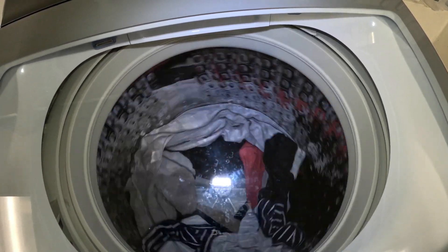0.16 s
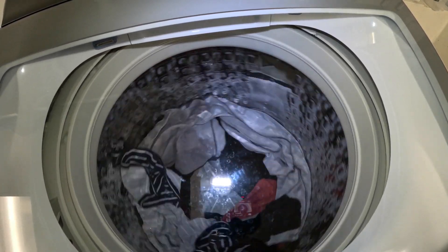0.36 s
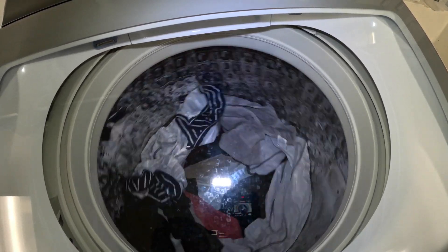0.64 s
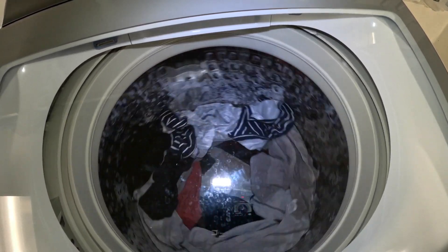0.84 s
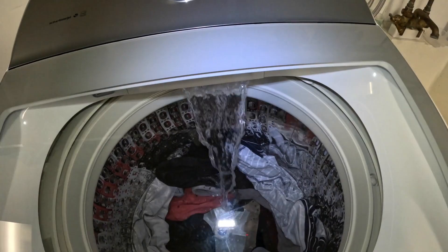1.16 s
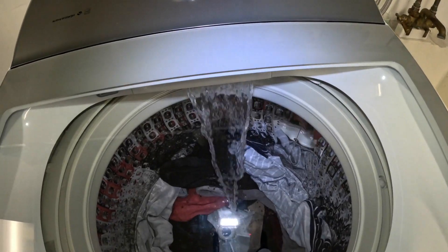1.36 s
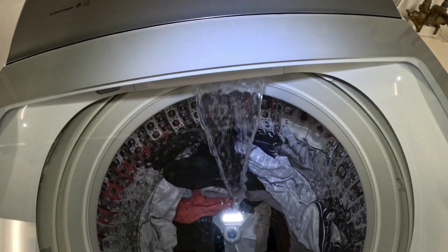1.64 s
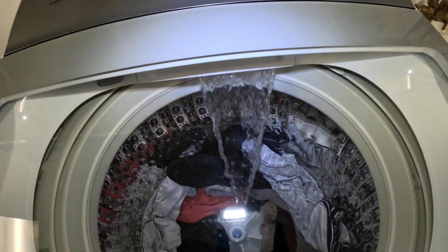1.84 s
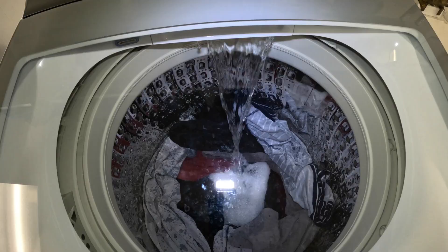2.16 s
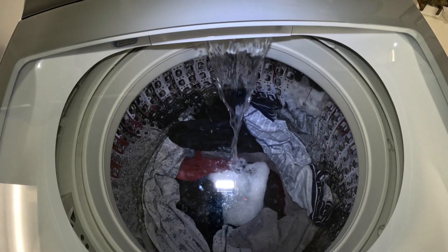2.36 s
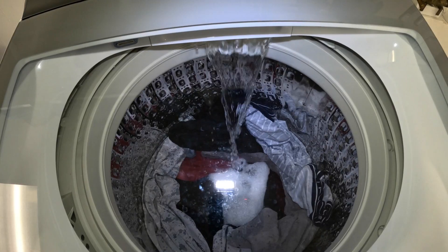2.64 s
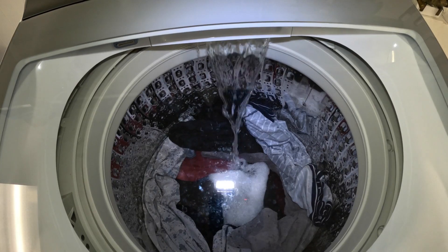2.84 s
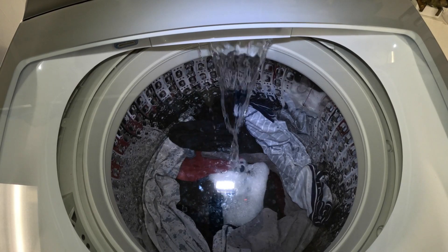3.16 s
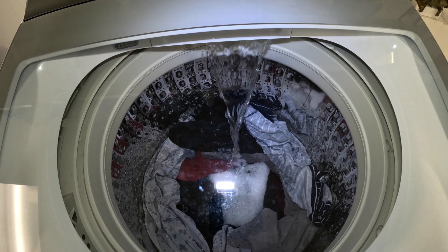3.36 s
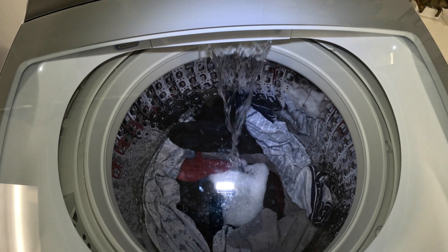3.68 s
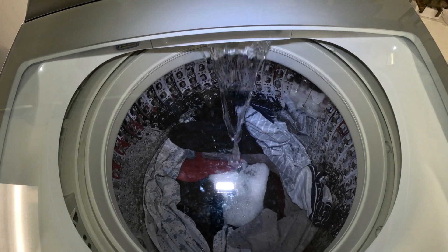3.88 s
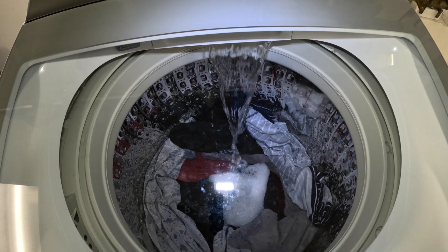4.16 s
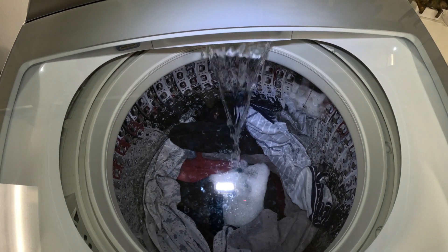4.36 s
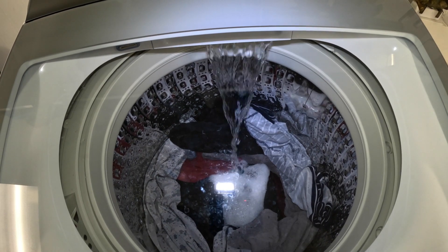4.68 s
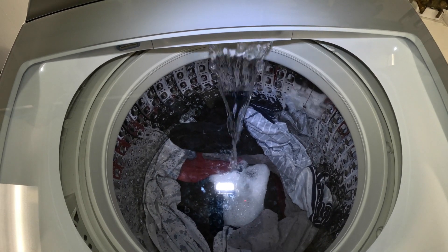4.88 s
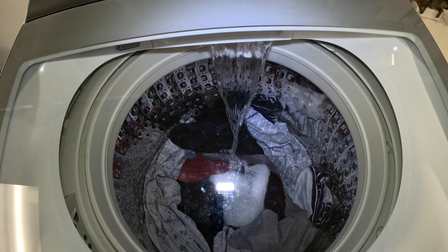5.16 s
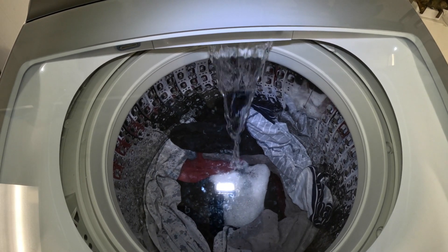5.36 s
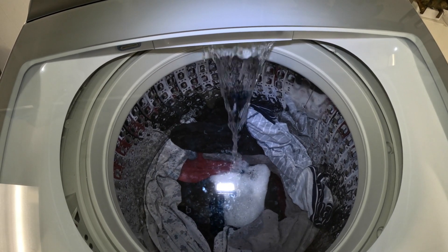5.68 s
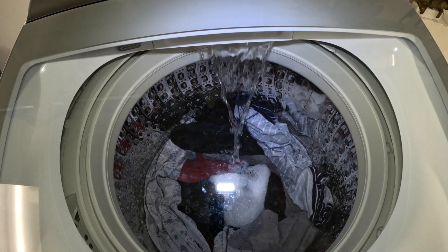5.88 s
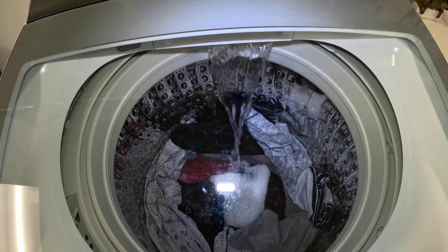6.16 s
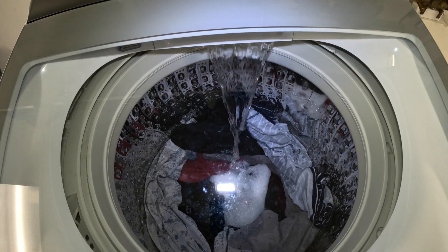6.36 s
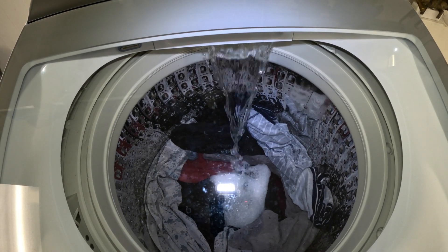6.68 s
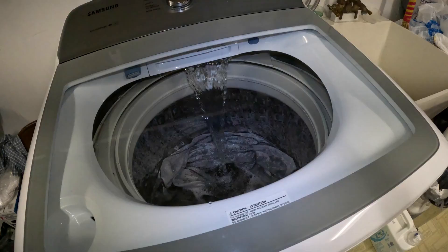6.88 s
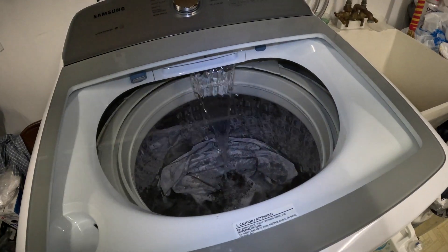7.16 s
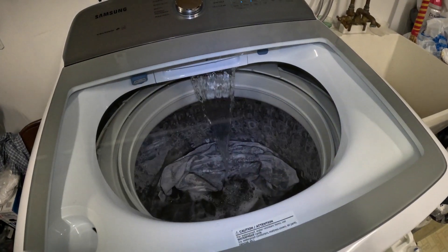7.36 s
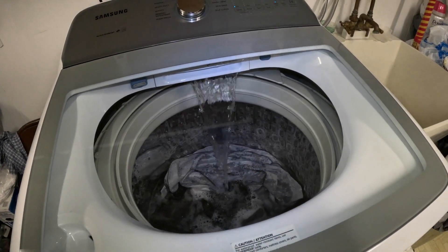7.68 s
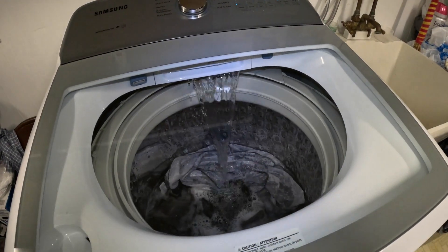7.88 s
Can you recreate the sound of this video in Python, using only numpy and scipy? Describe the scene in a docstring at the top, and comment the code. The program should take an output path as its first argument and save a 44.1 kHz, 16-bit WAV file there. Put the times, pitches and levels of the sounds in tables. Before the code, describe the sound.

A top-loading washer's drum coasts with faint low hum swells for a second. Water abruptly pours in close by, hissing and booming with a hollow gurgle, a few small knocks and ticks. The pour then becomes steady, boomier and less sharp, with occasional splashes. It stops dead for a moment, and returns fading in, quieter and farther away, in a small utility room.

```python
"""Top-loading washer filling

A washer is heard from four spots: its drum coasts as swelling sine hums over noise; then water hisses
and pours as patchy noise shaped by resonances of drum and cabinet, first close, then from a step aside.
A hollow gurgle, knocks, bright ticks and splashes join it; after a short silence the rush fades in
further off."""
import sys
import numpy as np
from scipy import signal
from scipy.fft import rfft, irfft, next_fast_len
from scipy.io import wavfile
from scipy.ndimage import uniform_filter1d

SR = 44100
rng = np.random.default_rng(int(sys.argv[2]) if len(sys.argv) > 2 else 0)


def bounce(signal):
    """Save signal as a 16-bit WAV file at the path given by the first command-line argument."""
    frames = np.transpose(np.atleast_2d(signal))
    limited = np.clip(frames, -1, 1)
    pcm = np.round(limited * 32767).astype(np.int16)
    wavfile.write(sys.argv[1], SR, pcm)


N = 353814

# Timeline. Each entry: start in seconds of the coasting, close, aside, silent and far parts.
PART_STARTS = [0, .9799, 2.222, 6.9186, 7.091]
COAST_S, CLOSE_S, ASIDE_S, SILENT_S, FAR_S = PART_STARTS

# Swells of the drum's hum. Each row: start in s, length in s, frequency in Hz, rms level at the crest in dB.
HUM_SWELLS = [(-.03, .24, 60, -50.5), (.28, .5, 57.2, -48.5), (0.771, .09, 57.1, -52),
              (.86, .13, 57.1, -54.5)]
# Cabinet shake around the hum. Each row: frequency in Hz, relative density in dB per Hz.
SHAKE_SPECTRUM = [(10, -40), (22, 0), (40, -11), (70, -2), (110, -9), (170, -21), (230, -34), (400, -120)]
# Murmur resonances. Each row: frequency in Hz, width in Hz, relative level in dB.
MURMUR_MODES = [(220, 18, -9.5), (258, 35, -4.5), (309, 25, -3), (345, 33, -10.5)]
# Room before the water. Each row: frequency in Hz, relative density in dB per Hz.
ROOM_SPECTRUM = [(240, -25), (400, -5), (536, -9), (865, -12.5), (1180, -12), (1960, -20.5), (4240, -27.5),
                 (5870, -23), (9040, -35), (16000, -48)]
# Room likeness. Each row: frequency in Hz, left-right correlation.
ROOM_LIKENESS = [(60, 0.86), (240, 0.9), (950, 0.25), (3770, 0.32), (15000, 0.33)]
# Faint motor whine. One row: frequency in Hz, width in Hz, rms level in dB.
MOTOR_WHINE = (5701, 30, -97)
HUM_POWER = 1  # exponent of each swell's sine arch
SHAKE_DB, MURMUR_DB, HUSH_DB = -8, -62.5, -77  # the shake is relative to the hum

# Water at the close, aside and far spots. Each row: hiss in dB, initial boom in dB, boom growth in dB per s.
WATER_LEVELS = [(-34.5, -38.5, 3), (-34.5, -34.5, 0.11), (-54, -52.5, 0.5)]
# Air in drum and cabinet. Each row: frequency in Hz, width in Hz, relative level in dB close, aside, far.
DRUM_MODES = [(54, 14.5, -10.5, -11.5, -8), (85.2, 16, -11.5, -14.5, -11.5), (119.6, 16, -17, -12, -10.5),
              (159, 27, -12, -19, -12), (215.9, 14.5, -3, -1.5, -1.5), (240.2, 9.8, -3, 3.5, -2),
              (273.3, 15.3, -1, -1, 2), (299.6, 18, -7, -5, -6.5), (343.5, 20.6, -7.5, -4.5, -5.5),
              (418.5, 23, -12, -13.5, -9.5), (459, 53, -20.5, -17.5, -24), (524, 21, -12.5, -19, -20),
              (619, 45, -13, -18, -14), (686.5, 16, -16.5, -15, -9), (758, 10, -16.5, -28, -22)]
# Boom between those modes. Each row: frequency in Hz, relative density in dB per Hz.
BOOM_FLOOR = [(12, -35), (30, -29), (180, -24), (260, -9), (450, -20), (850, -35), (1200, -58.5),
              (2000, -120)]
# Valve, lid and tub: one list per spot. Each row: frequency in Hz, width in Hz, relative level in dB.
HISS_MODES = [
    [(1300, 60, -5), (1770, 70, -5), (2080, 80, -1), (2220, 40, -4), (2455, 45, -1), (2740, 50, -1),
     (2955, 35, -2), (3240, 130, -2), (3770, 55, 1), (4120, 60, -4), (4670, 90, -3), (4950, 40, -3),
     (5230, 80, -2), (5625, 50, -1), (5950, 140, -3), (6350, 55, -3), (6950, 180, -6), (7610, 60, -7),
     (8600, 70, -8), (8900, 100, -7)],
    [(925, 60, -1), (1082, 30, -1), (1220, 60, -8), (1310, 60, -6.5), (1410, 50, -5), (1700, 60, -8.5),
     (1790, 40, -11), (2110, 90, -8), (2289, 30, -5.5), (2445, 80, -6.5), (2590, 40, -10), (2737, 45, -7.5),
     (3075, 45, -7.5), (3200, 80, -9), (3430, 100, -13), (3790, 70, -9.5), (3990, 50, -11), (4290, 40, -12),
     (4455, 60, -9.5), (4655, 45, -10.5), (5070, 210, -10.5), (5350, 120, -11), (5635, 50, -10),
     (6020, 200, -11.5), (6425, 70, -11), (6794, 40, -8), (7870, 60, -15), (8280, 50, -15), (8565, 40, -14),
     (8980, 260, -15.5)],
    [(825, 40, -3), (940, 90, -1), (1080, 40, -1), (1416, 45, -4), (1745, 80, -4), (2076, 30, -5),
     (2220, 100, -5), (2603, 40, -8), (2780, 55, -7), (2950, 80, -7), (3850, 150, -14), (4240, 40, -14),
     (4900, 100, -14), (5710, 150, -14), (6740, 60, -19)],
]
# Hiss between those modes: one list per spot. Each row: frequency in Hz, relative density in dB per Hz.
HISS_FLOOR = [
    [(600, -21.5), (1000, 7.5), (1180, -7), (1600, -8), (1930, -18.5), (2300, -7.5), (3800, -6.5),
     (6500, -9.5), (9100, -13.5), (10200, -25), (12500, -26), (13500, -39.5), (15200, -35.5), (16000, -46)],
    [(400, -46), (700, -14), (1200, -10.5), (1560, -17), (1950, -16), (2300, -13), (4100, -16), (7200, -16),
     (9200, -20), (9800, -28.5), (12500, -36.5), (13500, -41.5), (15000, -42.5), (16000, -54)],
    [(290, -25), (500, -6), (933, -3), (1190, -8.5), (1740, -10), (1930, -13), (2160, -13), (2890, -10),
     (3440, -13), (5710, -15), (12300, -33), (16000, -50)],
]
# Near water before its echoes. Each row: frequency in Hz, left-right correlation.
NEAR_LIKENESS = [(60, 0.98), (130, 0.99), (290, 1), (640, 0.7), (1410, 1), (3100, 0.94), (6820, .9),
                 (10000, 0.88), (12000, 0.39), (15000, .3)]
# Near level difference. Each row: frequency in Hz, left over right in dB.
NEAR_LEAN = [(60, 0), (200, 0.5), (400, 0.1), (800, -0.5), (3000, 0.4), (6000, -0.5), (10000, 2.5),
             (15000, 3.5)]
# Near phase difference. Each row: frequency in Hz, phase by which left leads in radians.
NEAR_LEAD = [(0, -0.078), (520, -0.053), (1030, -0.043), (1640, -0.8), (3100, -0.75), (3360, -0.68),
             (4050, -0.8), (5770, -0.31), (6550, -0.2), (6980, -0.3), (9560, -0.0), (12000, 0.0),
             (14300, -0.6), (15800, 0.2)]
WALL_T60_S, WALL_WET_DB = 0.12, -17
RIM_MS, RIM_MS_PER_S, RIM_DB, RIM_DB_PER_S = 0.63, -0.135, -19, 7  # initial delay and level, with their drifts
BLEND_S = 0.062  # crossfade from close to aside

# Inlet cavity. Each row: frequency in Hz, width in Hz, relative level in dB.
INLET_MODES = [(925.6, 36.5, 2), (932, 55, -15.5)]
# Swells of the gurgle. Each row: centre in s, rise in dB.
GURGLE_SWELLS = [(1.306, 7.5), (1.8, 1.5), (1.915, 7), (2.15, 6)]
GURGLE_DB, GURGLE_SAG_DB_PER_S, GURGLE_ATTACK_S = -36, 5, 0.05
GULP_S = 0.04  # standard deviation of each swell

# Small knocks as the microphone moves. Each row: start in s, nominal level in dB, frequency in Hz.
KNOCKS = [(1.898, -29, 1760), (1.987, -29, 1790), (2.086, -28, 1820)]
# Brief bright ticks, one at the change of spot. Each row: start in s, nominal level in dB.
BRIGHT_TICKS = [(2.075, -40), (2.21, -53), (4.671, -57)]
# Single splashes in the stream. Each row: start in s, nominal level in dB, centre frequency in Hz.
STREAM_SPLASHES = [(2.8596, -29, 2290), (6.0418, -30, 2440), (6.0982, -31, 1070)]
KNOCK_T60_S, TICK_T60_S, SPLASH_T60_S = 0.047, 0.02, 0.04

# Brief swell of the far rush. One row: centre in s, standard deviation in s, rise in dB.
FAR_SURGE = (7.31, 0.056, 4)
FADE_IN_S, FADE_POWER = 1, 0.62  # the far gain is a power of time, and would reach 1 after FADE_IN_S
TOP_HZ = 15750  # band limit


def amp(db):
    """A level in dB is twenty times the logarithm of amplitude."""
    return 10 ** (np.asarray(db) / 20)


def unit(x):
    """Division by the root mean square gives unit power."""
    return x / np.sqrt(np.mean(x ** 2) + 1e-20)


def along(points, hz):
    """A spectrum is interpolated through (Hz, value) points on a logarithmic frequency axis."""
    f, v = np.transpose(points)
    return np.interp(np.log(hz + 1), np.log(f + 1), v)


def between(start, end):
    """A rectangular gate is 1 inside a span of seconds and 0 outside."""
    t = np.arange(N) / SR
    return (t >= start) & (t < end)


def since(s):
    """Elapsed time counts seconds after a moment and is 0 before it."""
    return np.maximum(np.arange(N) / SR - s, 0)


def bump(s, width):
    """A Gaussian bell of height 1 stands around a moment, with width as its standard deviation."""
    return np.exp(-.5 * ((np.arange(N) / SR - s) / width) ** 2)


def filtered(x, response):
    """Linear filtering multiplies the spectrum by a response of frequency."""
    m = next_fast_len(x.shape[-1] + SR // 2)
    hz = np.fft.rfftfreq(m, 1 / SR)
    return irfft(rfft(x, m) * response(hz), m)[..., :x.shape[-1]]


def resonant(modes, valley, valley_db):
    """Powers of independent modes and of the smooth floor between them add."""
    grid = np.arange(0, SR / 2, 2)
    mode_power = sum(amp(db) ** 2 / (1 + ((grid - c) / w) ** 2 * 2) ** 2 for c, w, db in modes)
    floor_power = amp(along(valley, grid) + valley_db) ** 2
    gain = np.sqrt(mode_power + floor_power)
    return lambda hz: np.interp(hz, grid, gain)


def rush(gain, alike, span, patchy_db):
    """Turbulence is noise of uneven local strength; mixing mid and side sets its left-right correlation."""
    # a quarter second of margin on either side of the span
    start, end = np.clip((np.array(span) * SR).astype(int) + [-SR // 4, SR // 4], 0, N)
    z = signal.stft(rng.standard_normal((2, end - start)), nperseg=512)[2]
    patches = uniform_filter1d(rng.standard_normal(z.shape[1:]), 6, 0)  # smooth over frequency
    patches = uniform_filter1d(patches, 8, 1)  # smooth over time
    pair = signal.istft(z * amp(patchy_db * unit(patches)), nperseg=512)[1][:, :end - start]

    def mid_side_gain(hz):
        # the cosine of twice this angle is the correlation
        angle = np.arccos(np.clip(along(alike, hz), -1, 1)) / 2
        return gain(hz) * [np.cos(angle), np.sin(angle)]

    mid, side = filtered(pair, mid_side_gain)
    stereo = np.array([mid + side, mid - side]) / np.sqrt(np.mean(mid ** 2) + 1e-20)
    return np.pad(stereo, [(0, 0), (start, N - end)])


def coasting():
    """The slowing drum radiates a tonal hum, shakes the cabinet and murmurs over the room's hush."""
    t = np.arange(N) / SR
    arches, hum = 0, 0
    for start, length, hz, db in HUM_SWELLS:
        phase = np.pi * np.clip((t - start) / length, 0, 1)
        arch = amp(db) * np.sin(phase) ** HUM_POWER
        arches = arches + arch
        hum = hum + arch * np.sqrt(2) * np.sin(2 * np.pi * hz * t)

    def room_noise(gain, patchy_db):
        return rush(gain, ROOM_LIKENESS, (COAST_S, CLOSE_S), patchy_db)

    shake = amp(SHAKE_DB) * room_noise(lambda f: amp(along(SHAKE_SPECTRUM, f)), 2.5)
    murmur = amp(MURMUR_DB) * room_noise(resonant(MURMUR_MODES, SHAKE_SPECTRUM, valley_db=-12), -0.2)
    hush = amp(HUSH_DB) * room_noise(lambda f: amp(along(ROOM_SPECTRUM, f)), 1.5)
    whine_hz, whine_width, whine_db = MOTOR_WHINE
    whine_gain = resonant([(whine_hz, whine_width, 0)], ROOM_SPECTRUM, valley_db=-120)
    whine = amp(whine_db) * room_noise(whine_gain, 3)
    return hum + arches * shake + murmur + hush + whine


def walls(x, t60, wet_db, apart):
    """Dense short echoes from tub and walls ripple the spectrum; the angle apart makes channels differ."""
    t = np.arange(SR // 8) / SR
    both, left, right = rng.standard_normal((3, len(t))) * amp(-60 * t / t60)
    echo = np.cos(apart) * both + np.sin(apart) * np.array([left, right])
    echo *= amp(wet_db) / np.linalg.norm(both)
    echo[:, 0] = 1  # direct sound
    return signal.fftconvolve(x, echo / np.linalg.norm(echo[0]), axes=1)[:, :N]


def filling(spot, span, alike, valley_db, patchy_db, apart):
    """Turbulent water excites the valve, lid and tub as hiss and the drum's air modes as boom."""
    hiss_db, boom_db, growth = WATER_LEVELS[spot]
    hiss = rush(resonant(HISS_MODES[spot], HISS_FLOOR[spot], valley_db), alike, span, patchy_db)
    hiss = walls(hiss, WALL_T60_S, WALL_WET_DB, apart)
    modes = [(hz, width, dbs[spot]) for hz, width, *dbs in DRUM_MODES]
    boom = rush(resonant(modes, BOOM_FLOOR, valley_db=0.0), alike, span, patchy_db=0.36)
    return amp(hiss_db) * hiss + amp(boom_db + growth * since(span[0])) * boom


def rim_echo(x):
    """A dull reflection off the tub's rim forms a comb that slides upward as the microphone drifts."""
    t = np.minimum(since(CLOSE_S), ASIDE_S - CLOSE_S)
    dull = filtered(x, lambda hz: 1 / (1 + (hz / 7000) ** 4))
    samples = np.arange(N)
    delay = (RIM_MS + RIM_MS_PER_S * t) * SR / 1000
    late = np.array([np.interp(samples - delay, samples, channel) for channel in dull])
    return x + amp(RIM_DB + RIM_DB_PER_S * t) * late


def gurgle():
    """Turbulence excites the inlet's cavity; its hollow note builds up, sags slowly and swells in gulps."""
    t = since(CLOSE_S)
    swells = sum(rise * bump(s, GULP_S) for s, rise in GURGLE_SWELLS)
    level = amp(GURGLE_DB - GURGLE_SAG_DB_PER_S * t + swells)
    attack = np.minimum(t / GURGLE_ATTACK_S, 1)
    cavity = resonant(INLET_MODES, BOOM_FLOOR, valley_db=-120)
    return level * attack * rush(cavity, NEAR_LIKENESS, (CLOSE_S, ASIDE_S), patchy_db=0.5)


def struck(events, t60, attack_s, source):
    """An impulsive event rises fast and decays exponentially, by 60 dB in t60 seconds."""
    out = np.zeros(N + SR)
    t = np.arange(SR // 10) / SR
    for s, db, *hz in events:
        envelope = amp(db - 60 * t / t60) * (1 - np.exp(-t / attack_s))
        out[round(s * SR):][:len(t)] += envelope * source(t, *hz)
    return out[:N]


def knocks():
    """A knock sets two partials ringing and adds a dull thud of low-passed noise."""
    def source(t, hz):
        ring = np.sin(2 * np.pi * hz * t) + 0.88 * np.sin(2 * np.pi * 1.5 * hz * t + 1)
        thud = unit(filtered(rng.standard_normal(len(t)), lambda f: 1 / (1 + (f / 3500) ** 4)))
        return 0.7 * ring + 1.1 * thud
    return struck(KNOCKS, KNOCK_T60_S, 0.0012, source)


def bright_ticks():
    """A brief burst of white noise, with its flat spectrum, is heard as a bright tick."""
    return struck(BRIGHT_TICKS, TICK_T60_S, 0.001, lambda t: rng.standard_normal(len(t)))


def splashes():
    """A splash is a burst of noise passed through one broad resonance."""
    def source(t, hz):
        noise = rng.standard_normal(len(t))
        return unit(filtered(noise, lambda f: 1 / (1 + ((f - hz) / (0.3 * hz)) ** 2)))
    return struck(STREAM_SPLASHES, SPLASH_T60_S, 0.0015, source)


def port_response(hz):
    """Level and phase differences between the channels are split evenly, with opposite signs."""
    side = np.array([[1], [-1]])
    return amp(along(NEAR_LEAN, hz) / 2 * side) * np.exp(.5j * along(NEAR_LEAD, hz) * side)


def scene():
    """Sounds superpose; an equal-power crossfade joins the close and aside spots."""
    close = filling(0, (CLOSE_S, ASIDE_S), NEAR_LIKENESS, valley_db=0.0, patchy_db=1.2, apart=1.0)
    close = rim_echo(close) + gurgle()
    aside = filling(1, (ASIDE_S, SILENT_S), NEAR_LIKENESS, valley_db=-1.5, patchy_db=0.72, apart=1.0)
    blend = np.pi / 2 * np.minimum(since(ASIDE_S - BLEND_S / 2) / BLEND_S, 1)
    water = close * np.cos(blend) + aside * np.sin(blend)
    near = filtered(water + knocks() + bright_ticks() + splashes(), port_response)
    # both channels carry the same sound at the far spot
    far = filling(2, (FAR_S, N / SR), [(100, 1)], valley_db=-3.5, patchy_db=0.5, apart=0)
    surge_s, surge_width, surge_db = FAR_SURGE
    fade = (since(FAR_S) / FADE_IN_S) ** FADE_POWER * amp(surge_db * bump(surge_s, surge_width))
    return coasting() * between(COAST_S, CLOSE_S) + near * between(CLOSE_S, SILENT_S) + far * fade


def record(dry):
    """A band-limited recorder passes nothing at or above its top frequency."""
    return filtered(dry, lambda hz: hz < TOP_HZ)


dry = scene()
out = record(dry)
bounce(out)
```